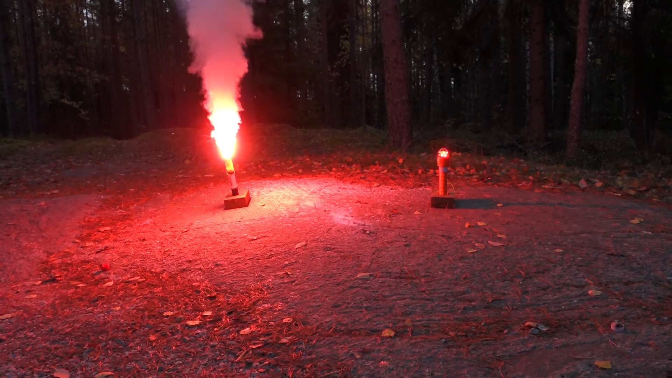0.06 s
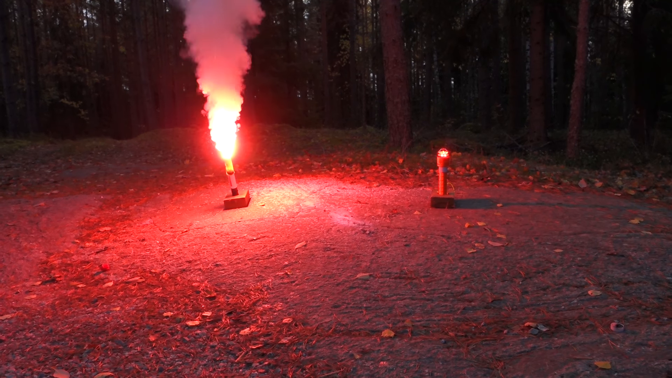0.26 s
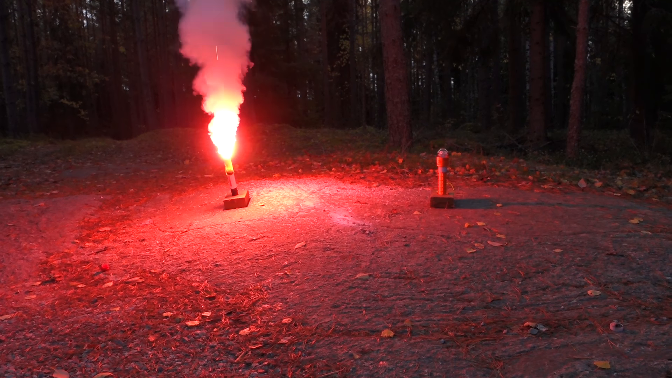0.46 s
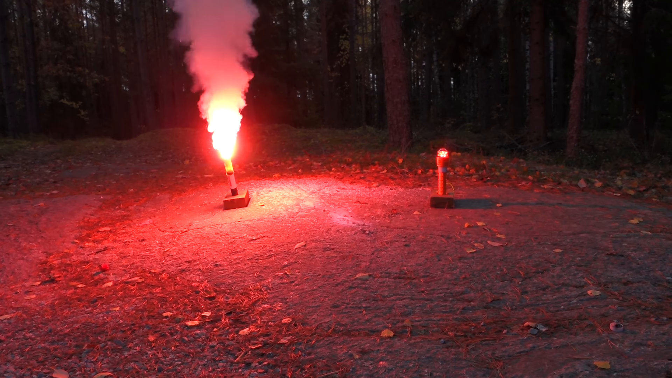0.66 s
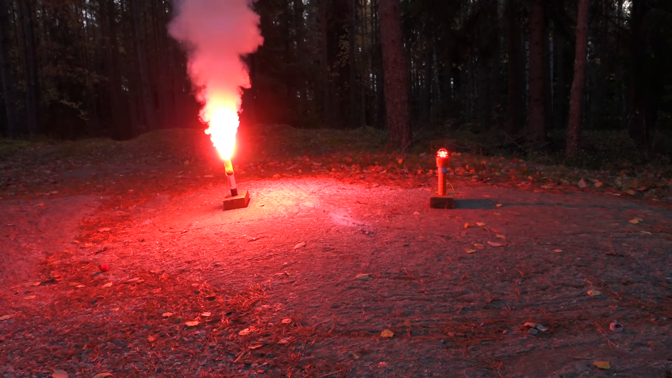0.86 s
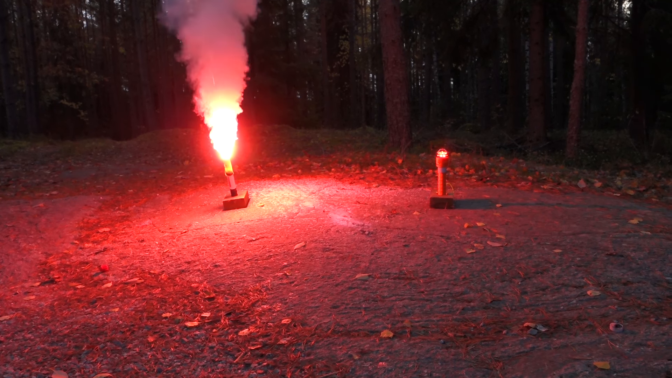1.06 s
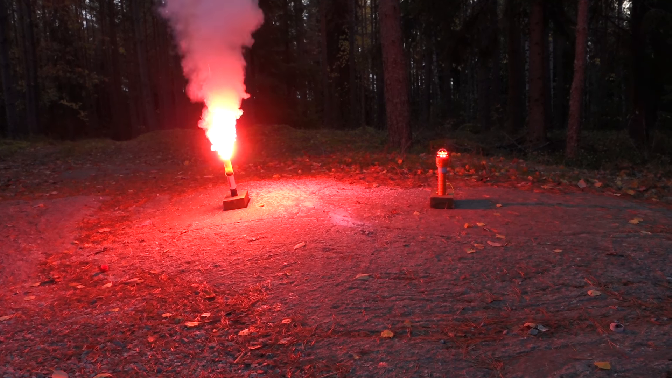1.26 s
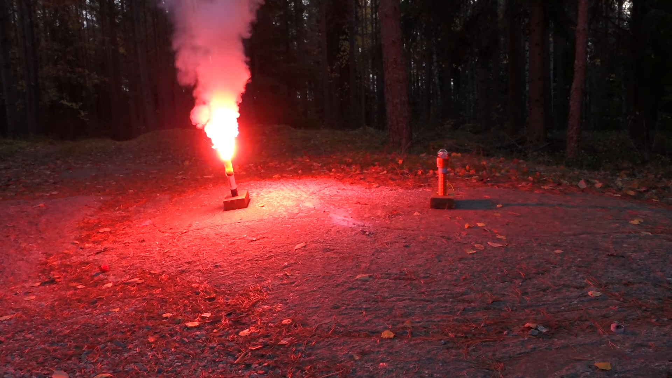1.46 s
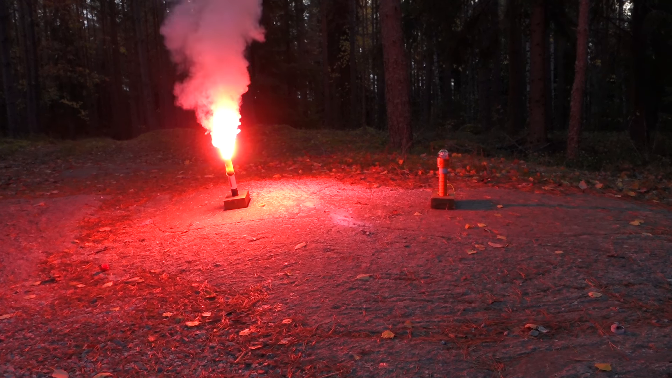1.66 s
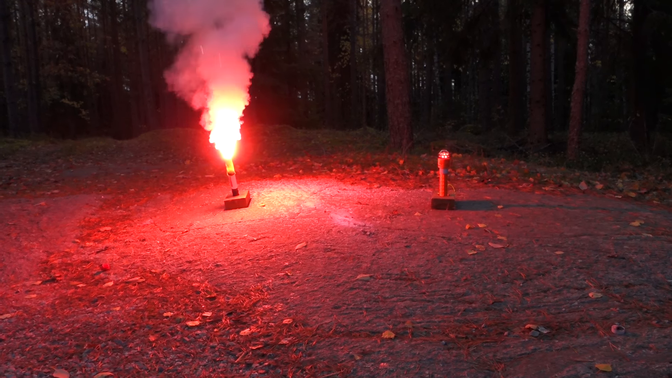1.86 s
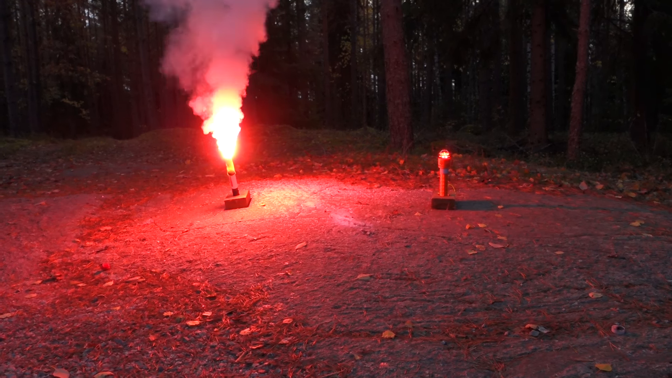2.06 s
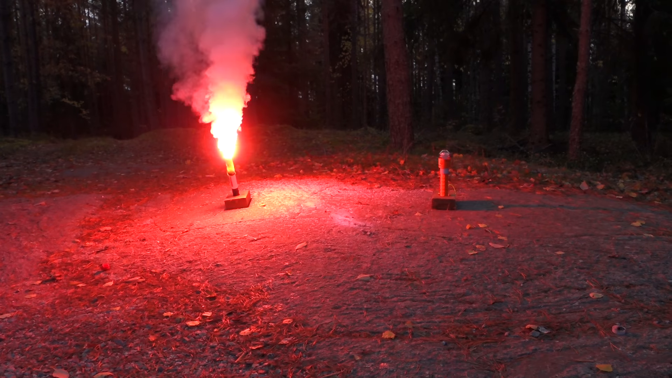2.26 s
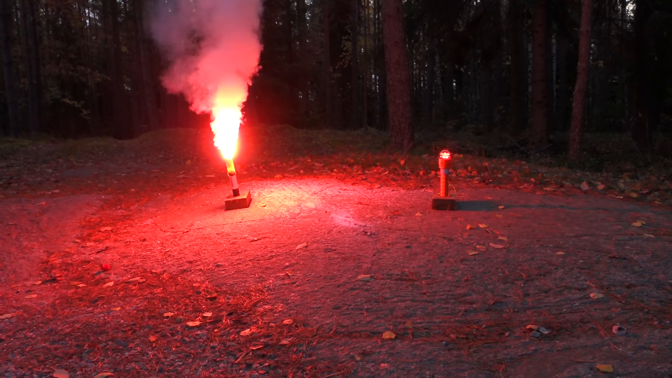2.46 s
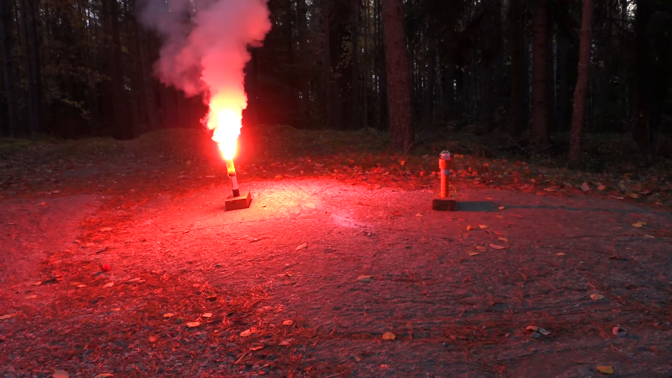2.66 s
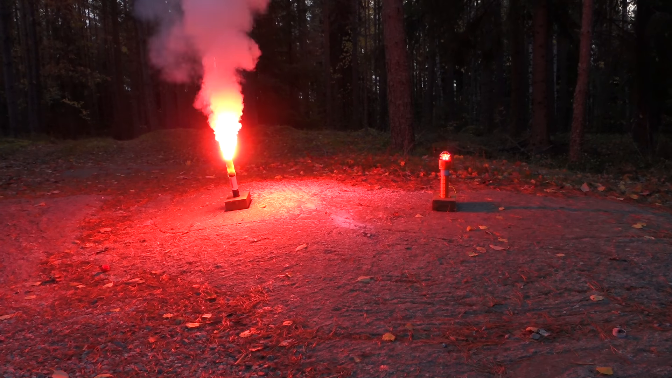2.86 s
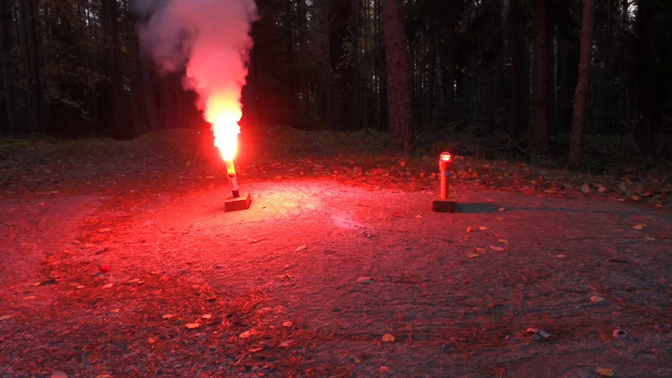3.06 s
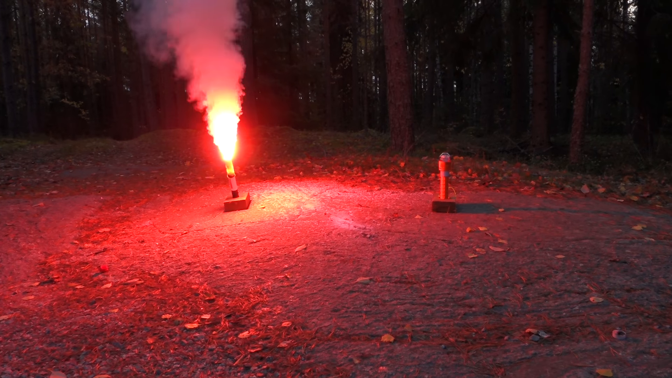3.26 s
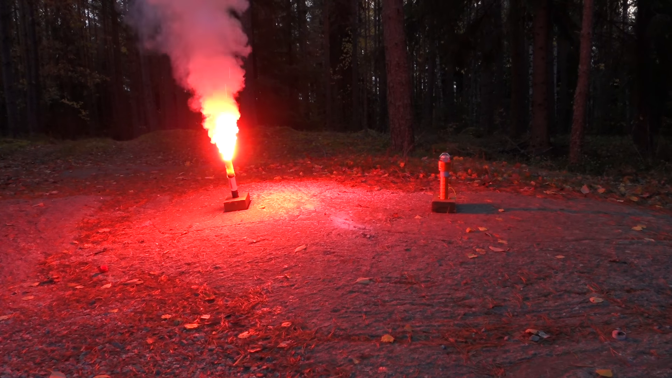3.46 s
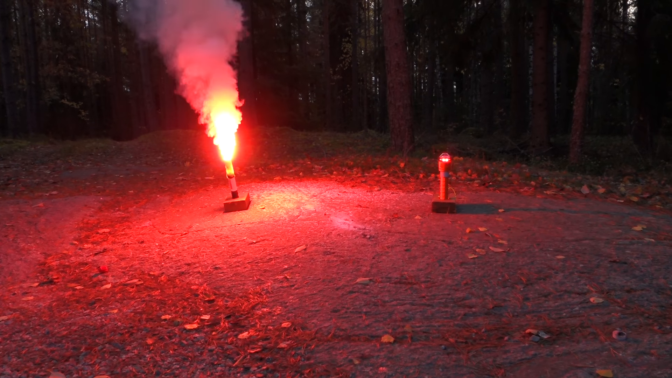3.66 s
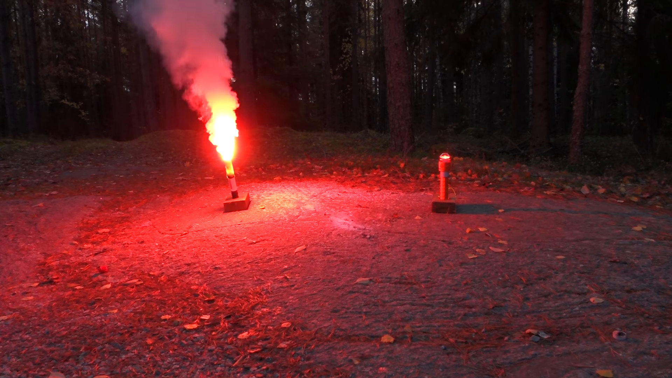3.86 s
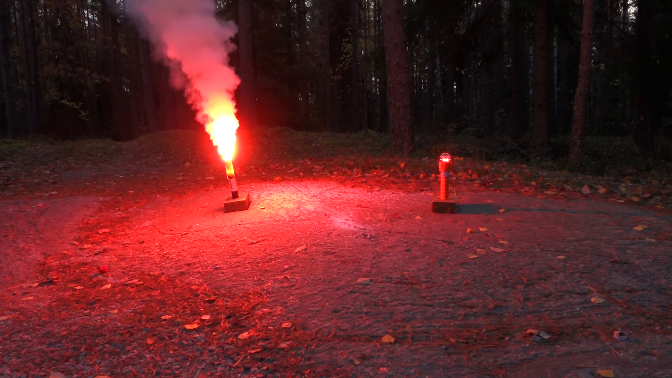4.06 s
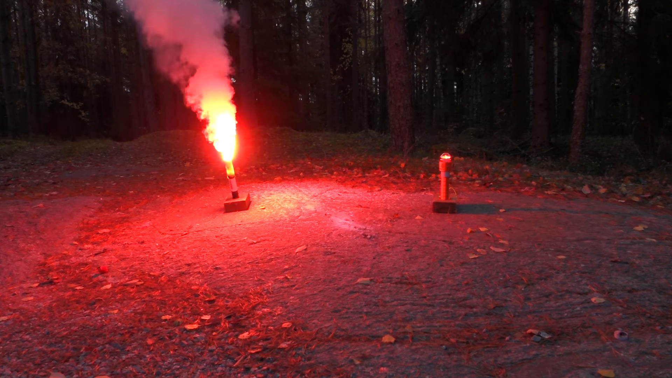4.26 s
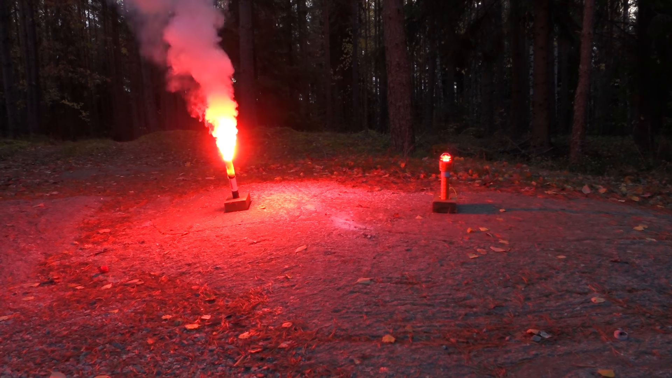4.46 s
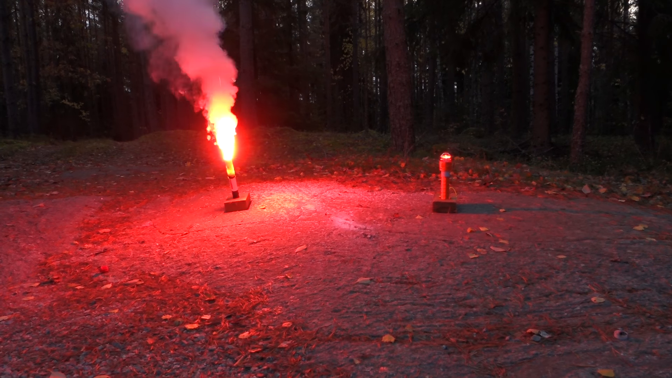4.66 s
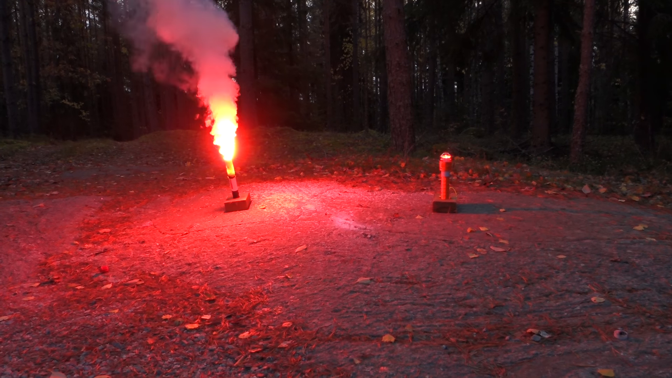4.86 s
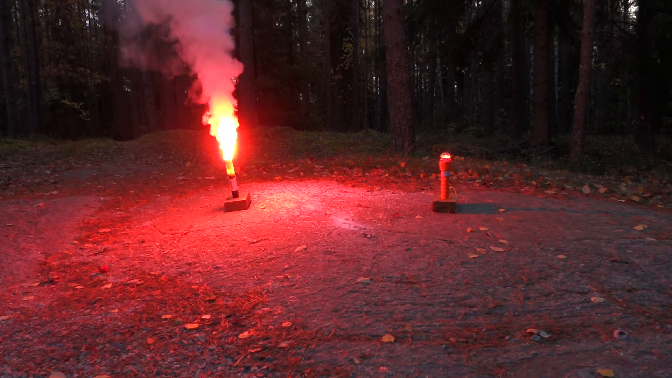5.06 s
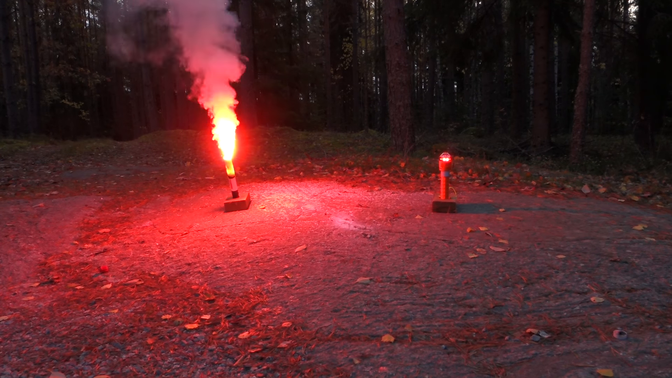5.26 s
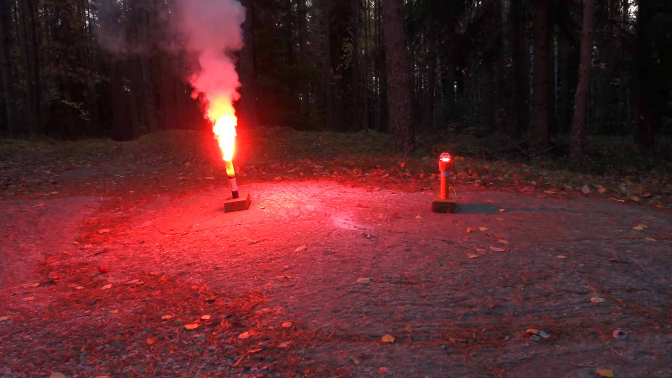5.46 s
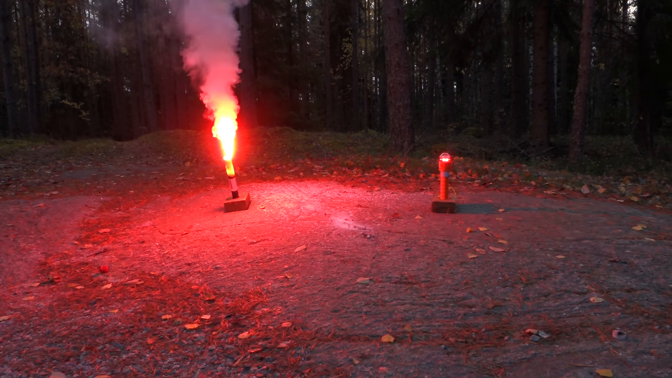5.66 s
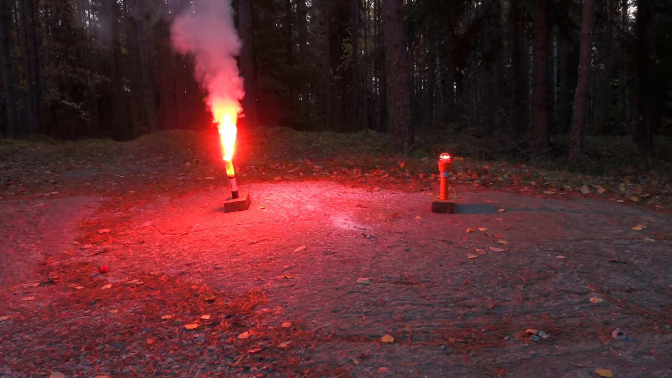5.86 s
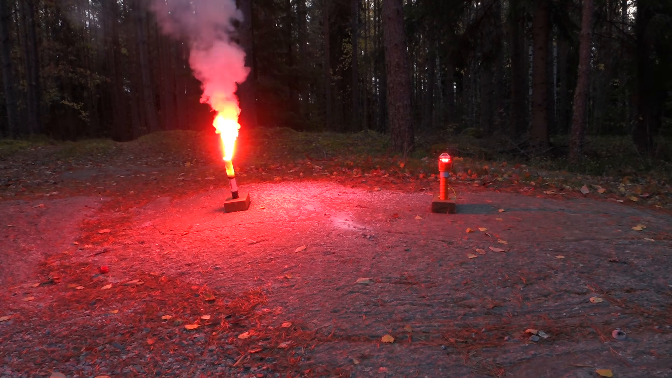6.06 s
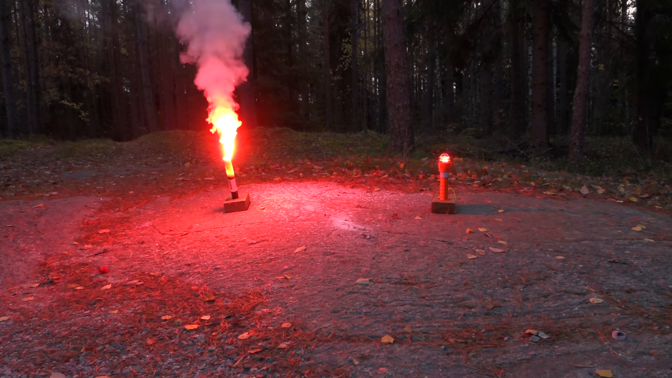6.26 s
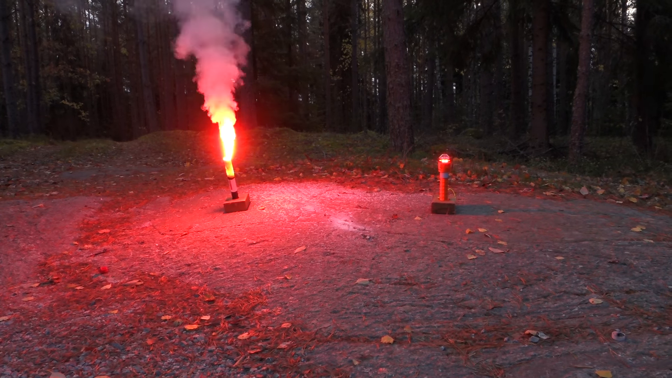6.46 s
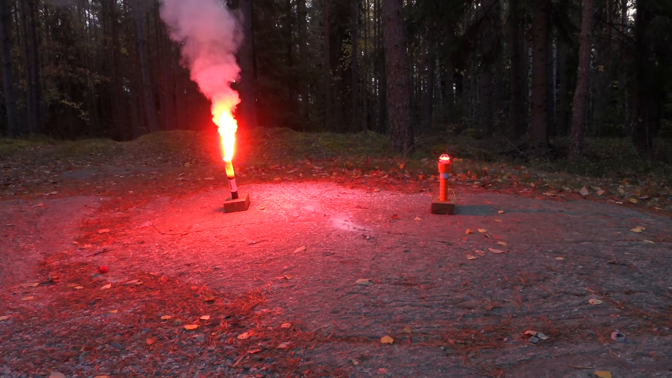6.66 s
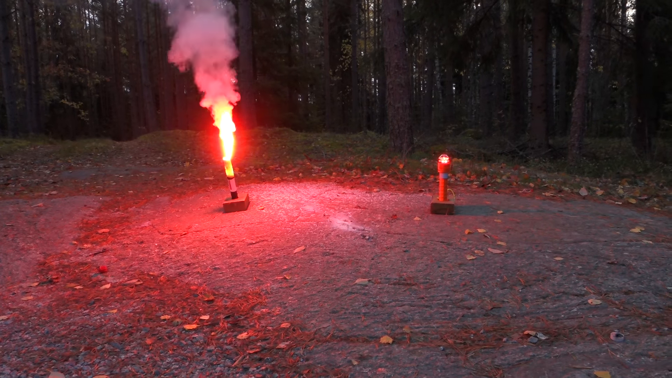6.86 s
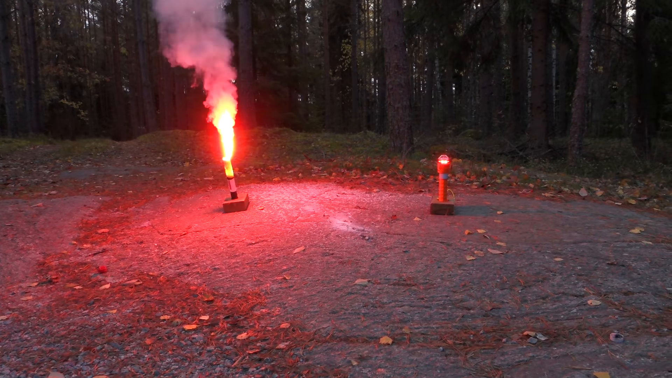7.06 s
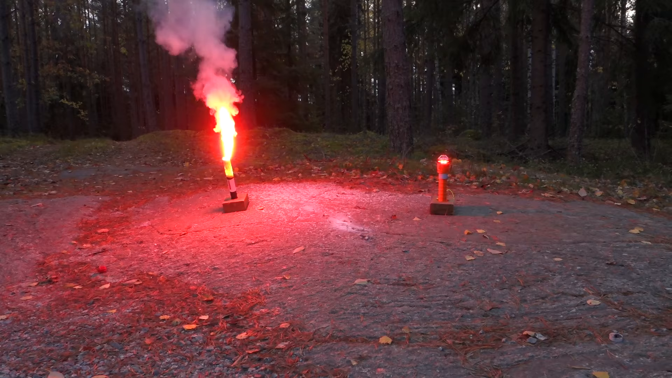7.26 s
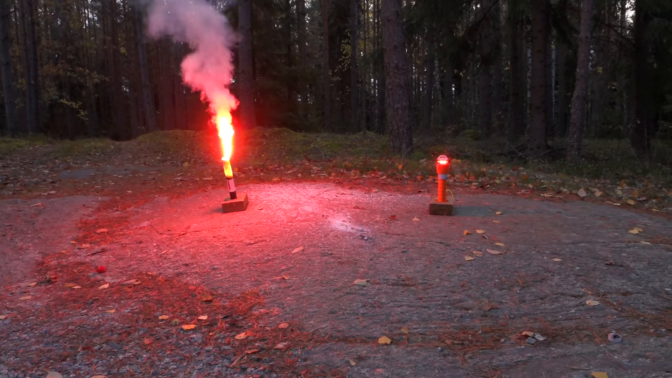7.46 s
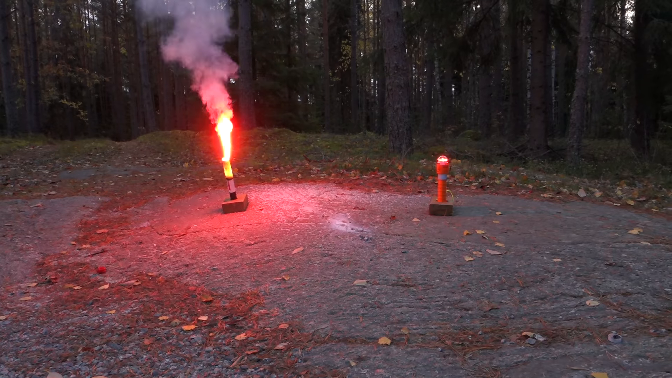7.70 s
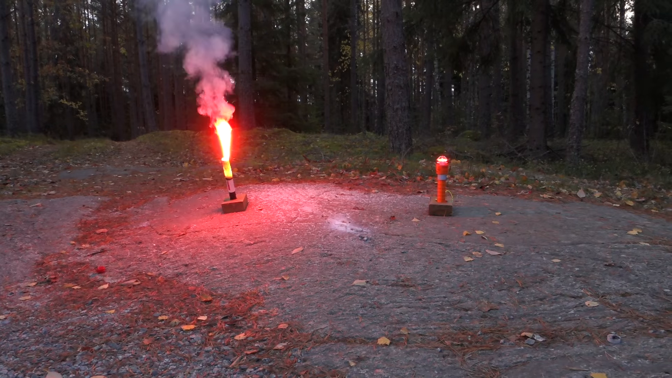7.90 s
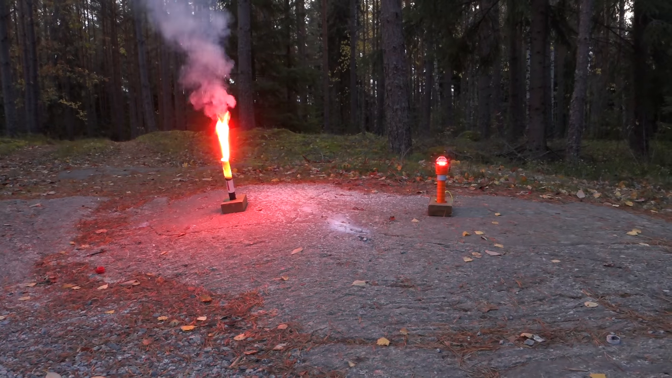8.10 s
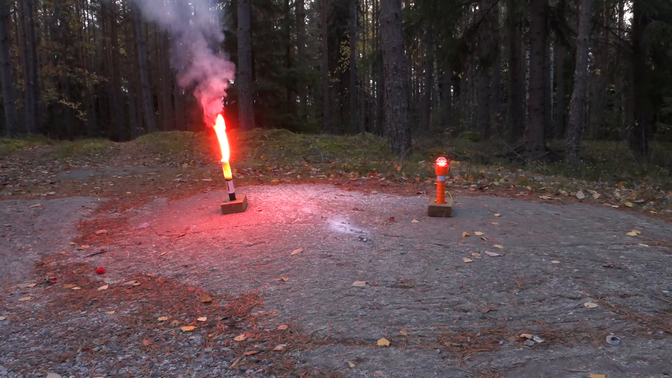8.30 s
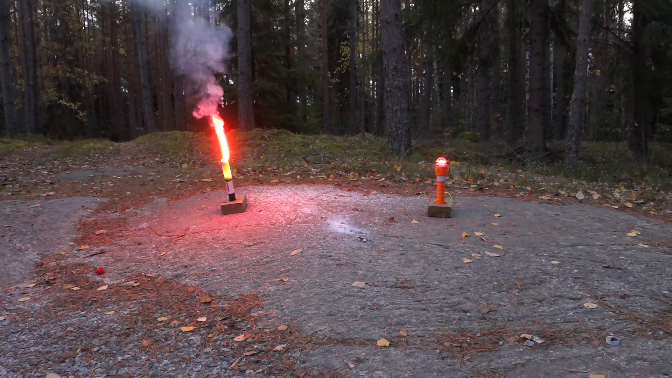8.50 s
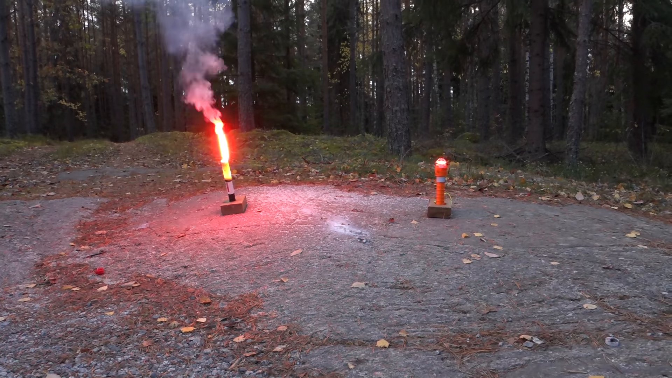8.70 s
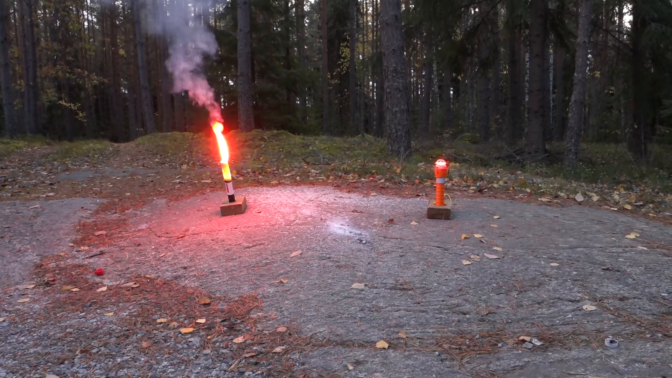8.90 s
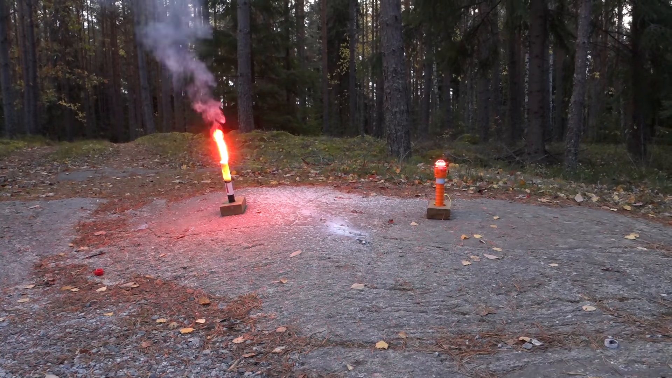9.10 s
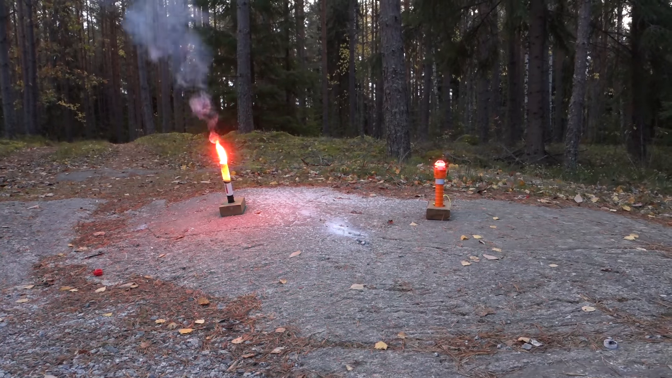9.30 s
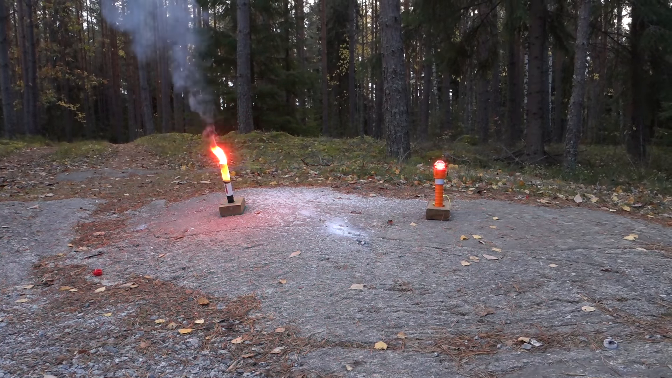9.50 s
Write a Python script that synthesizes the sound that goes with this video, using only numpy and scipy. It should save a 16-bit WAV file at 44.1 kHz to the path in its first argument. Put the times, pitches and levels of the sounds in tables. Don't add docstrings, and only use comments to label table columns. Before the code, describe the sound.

A hand flare roars and hisses loudly outdoors, then chokes, crackles and pops as it dwindles into near silence among trees.

```python
import sys
import numpy as np
from scipy import signal
from scipy.fft import rfft, irfft, next_fast_len
from scipy.io import wavfile
from scipy.ndimage import map_coordinates

SR = 44100
rng = np.random.default_rng(int(sys.argv[2]) if len(sys.argv) > 2 else 0)


def attenuation_scalar(level_db):
    decades = np.asarray(level_db, float) / 20
    return 10 ** decades


def generate_wav(signal):
    frames = np.transpose(np.atleast_2d(signal))
    scaled = np.clip(frames, -1, 1) * 32767
    pcm = np.round(scaled).astype(np.int16)
    wavfile.write(sys.argv[1], SR, pcm)


N = 420704

# start_s, share of single pops (0-1)
CHOKE = [
    (0, 0),
    (3.5, 0.12),
    (5, 0.42),
    (7, 0.24),
    (8, 0.5),
    (9.54, 0.7),
]
# freq_hz, level_db
FIZZ = [(3000, -33.5), (6000, 1.5), (8000, 5.5), (10000, -2.5), (12500, -4.5), (14000, -9.5), (15000, -1),
        (15800, -20)]


def unit(x):
    return x / np.sqrt(np.mean(x ** 2) + 1e-20)


def along(points, hz, axis=1):
    table = np.array(points)
    return np.interp(np.log(hz + 1), np.log(table[:, 0] + 1), table[:, axis])


def curves(rows):
    time_s, *columns = np.transpose(rows)
    return [np.interp(np.arange(N) / SR, time_s, column) for column in columns]


def wobble(knots_per_s):
    knots = rng.standard_normal(int(N * knots_per_s / SR) + 4)
    return map_coordinates(knots, [np.arange(N) * knots_per_s / SR])


def filtered(x, response):
    size = next_fast_len(N + 8192)
    return irfft(rfft(x, size) * response(np.fft.rfftfreq(size, 1 / SR)), size)[..., :N]


def pulse(spectrum, size=4096):
    level_db = along(spectrum, np.fft.rfftfreq(size, 1 / SR))
    cepstrum = irfft(np.log(attenuation_scalar(level_db)), size)
    cepstrum[1:size // 2] *= 2
    cepstrum[size // 2 + 1:] = 0
    shape = irfft(np.exp(rfft(cepstrum)), size)[:size // 2]
    return shape / np.abs(shape).max()


def coloured(x, spectrum):
    return signal.fftconvolve(x, pulse(spectrum))[:N]


def pair(two, likeness):
    def mid_side(hz):
        turn_rad = np.arccos(np.clip(likeness(hz), -1, 1)) / 2
        return np.array([np.cos(turn_rad), np.sin(turn_rad)])

    mid, side = filtered(two, mid_side)
    return np.array([mid + side, mid - side])


def turbulence(share, per_s, spread_db):
    chance, size, noise = rng.random(N), rng.exponential(size=N), rng.standard_normal(N)
    pop_amp = attenuation_scalar(spread_db * np.minimum(size, 5))
    bangs = unit((chance < per_s / SR) * pop_amp)
    share = np.clip(share, 0, 1)
    return np.sqrt(1 - share) * noise + np.sqrt(share) * (bangs - bangs.mean())


def flare():
    # freq_hz, level_db
    roar_colour = [(30, -21), (70, -27.5), (110, -17), (150, -13.5), (220, -7), (300, -2), (500, 2),
                   (800, 5.5), (1300, -13.5), (3000, -43)]
    jet_colour = [(300, -40), (800, 5.5), (1300, 0.5), (2000, 0), (3200, 0), (4300, -4.5), (5500, -11),
                  (7000, -15), (9000, -23.5), (14000, -48)]
    roar_db, deep_db, jet_db, bright_db, fizz_db = burn()
    choke, = curves(CHOKE)
    flicker_db = choke * (1.1 * wobble(25) + 2 * wobble(70))

    deep_hz, bright_hz = 330, 3200
    roar = unit(coloured(turbulence(0.24 * choke, per_s=900, spread_db=3.5), roar_colour))
    deep = filtered(roar, lambda hz: 1 / (1 + (hz / deep_hz) ** 4))
    roar = roar + (attenuation_scalar(deep_db) - 1) * deep

    jet = unit(coloured(turbulence(1.13 * choke, per_s=2000, spread_db=4.0), jet_colour))
    bright = filtered(jet, lambda hz: 1 - 1 / (1 + (hz / bright_hz) ** 6))
    jet = jet + (attenuation_scalar(bright_db + 5.5) - 1) * bright

    fizz = unit(coloured(turbulence(0.5 * choke, per_s=3100, spread_db=1.0), FIZZ))
    sizzle_db = (0.18 + 2.0 * choke) * wobble(22) + 1.67 * wobble(60)
    return (attenuation_scalar(roar_db + 0.17 * flicker_db + 3.5) * roar
            + attenuation_scalar(jet_db + flicker_db) * jet
            + attenuation_scalar(fizz_db + 0.78 * flicker_db + sizzle_db + 4.0) * fizz)


def burn():
    # start_s, gas_flow_db, slag crust over the mouth (0-1)
    burning = [(0, -21.5, 0), (2.0, -20.5, 0.07), (2.7, -22, 0.08), (3.3, -21, 0.21), (3.75, -23.5, 0.19),
               (4.25, -26, 0.58), (4.9, -28.5, 0.77), (5.4, -31, 0.89), (6.6, -32, 0.69), (7.2, -35, 0.43),
               (7.55, -36.5, 0.73), (7.65, -40.5, 0.24), (8.0, -42, 0.37), (8.15, -47.5, 0.3),
               (8.73, -52.5, 0.44), (8.77, -61.5, 0.4), (9.05, -65, 0.2), (9.13, -73.5, 0.2)]
    # centre_s, change_db
    surges = [(.75, 0.2), (1.75, 0.3), (3.0, -0.1), (3.8, 1.5), (3.92, -1), (4.1, 1.5), (4.4, 3.5),
              (4.6, 0.5), (4.72, -1), (4.95, 1.5), (5.2, 0), (5.5, 0.5), (5.8, 0.5), (5.9, -1.5), (6.07, 1),
              (6.2, -2), (6.3, 0.8), (6.82, -0.5), (7.1, 0.5), (7.3, -1), (7.4, 1), (7.72, 2), (8.25, 2),
              (8.42, 1), (8.63, -4), (8.72, -2), (8.84, 0.5), (9.04, 0)]
    # centre_s, roar_step_db, deep_step_db
    slumps = [
        (6.92, -0.5, 3),
        (7.6, -4, 6.5),
        (8.2, -3, -10),
        (8.78, 11.5, -5),
        (9.1, 6, -1),
    ]
    surge_half_s, slump_half_s = 0.031, 0.019
    surge_fizz, surge_roar = 1.6, 0.67
    ember_db_per_s = -28
    t = np.arange(N) / SR
    (gas_db, crust), (choke,) = curves(burning), curves(CHOKE)
    gas_db = gas_db + ember_db_per_s * np.maximum(t - burning[-1][0], 0)

    surge_db = sum(db * np.exp(-0.5 * ((t - s) / surge_half_s) ** 2) for s, db in surges)
    slump_db, deep_db = sum(np.outer(steps_db, 1 + np.tanh((t - s) / slump_half_s)) / 2
                            for s, *steps_db in slumps)

    roar_db = gas_db - 7.5 + 6 * crust + slump_db + surge_roar * surge_db
    bright_db = -3.5 - 6 * crust + 7.5 * choke
    fizz_db = gas_db - 16 - 13.5 * crust + 2 * choke + surge_fizz * surge_db
    return roar_db, deep_db, gas_db + surge_db, bright_db, fizz_db


def pops():
    # start_s, peak_db
    pockets = [(4.8434, -7), (5.3145, -22), (5.634, -15), (5.7066, -28), (5.882, -14), (6.9286, -12),
               (7.0236, -18), (7.0745, -25), (7.1902, -30), (7.3933, -15), (7.4168, -8), (7.4476, -13),
               (7.516, -9), (7.5444, -18), (8.0226, -21), (8.0433, -17.5), (8.4695, -33), (8.2124, -32),
               (8.244, -21.5), (8.4058, -26), (8.4384, -22), (8.4495, -31), (8.5675, -38), (8.5227, -28),
               (8.5362, -27.5), (8.723, -31), (8.7846, -44), (8.8639, -46), (8.9058, -37), (8.9886, -44)]
    edge_db, edge_grows = -39, 0.72
    blunt, edge = np.zeros(N), np.zeros(N)
    for s, db in pockets:
        at = round(s * SR) + 40
        blunt[at] = attenuation_scalar(db - 2.5)
        edge[at] = attenuation_scalar(edge_db + edge_grows * db)
    blunt_colour = [(100, -32), (500, -4), (1500, -5), (2500, 0), (4500, -8), (7000, -21), (12000, -45)]
    return coloured(blunt, blunt_colour) + coloured(edge, FIZZ)


def spits():
    # start_s, peak_db
    slag_bursts = [(0.661, -22), (1.0595, -22.5), (1.4539, -15), (2.8723, -24), (4.1519, -28),
                   (4.1971, -28), (4.4607, -22), (4.5607, -27), (4.6839, -25), (4.7807, -25), (4.8664, -29),
                   (4.9426, -31), (5.0002, -25), (5.1596, -33), (5.2016, -29), (5.2828, -31), (5.3869, -16),
                   (5.798, -25), (5.9851, -31), (6.3294, -41), (6.5356, -34), (6.8343, -22), (6.9852, -31),
                   (7.1011, -35), (7.1396, -29), (7.4011, -35), (7.5058, -40), (7.6168, -31), (7.875, -50),
                   (8.0195, -34)]
    # start_s, peak_db
    cracks = [(5.31, -32), (5.6576, -22), (5.6769, -36), (5.7432, -34), (5.754, -32), (5.9949, -24),
              (6.227, -37), (6.2455, -24), (6.2561, -15.5), (6.2998, -26), (6.4722, -20), (6.5603, -34),
              (6.6874, -20), (6.7622, -39), (6.9295, -23), (7.0247, -25), (7.267, -33), (7.3638, -22),
              (7.3906, -42), (7.5169, -30), (7.7045, -33), (7.8939, -32), (8.245, -34), (8.3481, -43),
              (8.5238, -29)]
    # freq_hz, level_db
    slag = [(3000, -30), (6000, -9), (8000, -5), (12000, 0), (15500, 2)]
    low_db, sizzle_db = -2, -18
    crack_snap_db, crack_snap_grows = -30, 0.4
    bursts = [(s, db, db + low_db) for s, db in slag_bursts]
    bursts += [(s, crack_snap_db + crack_snap_grows * db, db) for s, db in cracks]

    swell, snaps, thuds, t = np.zeros(N), np.zeros(N), np.zeros(N), np.arange(N) / SR
    for s, snap_db, thud_db in bursts:
        near = slice(round((s - 0.02) * SR), round((s + 0.06) * SR))
        u = (t[near] - s) / 0.004
        fall = 0.8 * np.exp(-1.5 * u) + 0.15 * np.exp(-0.4 * u)
        swell[near] += attenuation_scalar(snap_db + sizzle_db + 4.0) * np.where(u < 0, np.exp(1.2 * u), fall)
        snaps[round(s * SR) - 2] = attenuation_scalar(snap_db + 6.0)
        thuds[round(s * SR) - 4] = attenuation_scalar(thud_db + 1)
    sizzle = swell * unit(coloured(rng.standard_normal(N), slag))
    lower = coloured(thuds, [(1000, -24), (2500, -4), (4500, 0), (7000, -5), (11000, -26)])
    return sizzle + coloured(snaps, slag) + lower


def ground(x):
    # freq_hz, level_db
    soil = [(300, -11.5), (900, 0.4), (3000, -2.5), (5500, -12), (8000, -3), (10500, -15.5), (12500, -9),
            (15000, -3)]
    # freq_hz, left_over_right_db, left_lead_rad
    left = [(300, 0, .02), (740, .5, .03), (1220, 2.5, .08), (2010, 1.5, .15), (3330, 1, .35),
            (5500, 1.5, .55), (9080, .5, .6), (12500, -1.5, .9), (15000, -2, 1.6)]
    # delay_ms, level_db, phase_rad
    near_things = [
        (2.7, -19.5, 0.74),
        (3.25, -23, -0.8),
    ]
    # delay_ms, level_db, phase_rad, centre_hz
    stump = (5.55, -8, .28, 900)
    stump_octaves = 0.44
    delay_s, turn_rad = 0.00043, 0.78
    choke, = curves(CHOKE)

    def soil_response(hz):
        return attenuation_scalar(along(soil, hz)) * np.exp(-1j * (2 * np.pi * hz * delay_s + turn_rad))

    def echo(hz, ms, db, rad):
        return attenuation_scalar(db) * np.exp(1j * (rad - 2 * np.pi * hz * ms / 1000))

    def arrival(hz):
        octaves = np.log2((hz + 1) / stump[3])
        stump_echo = echo(hz, *stump[:3]) * np.exp(-0.5 * (octaves / stump_octaves) ** 2)
        near = 1 + stump_echo + sum(echo(hz, *thing) for thing in near_things)
        log_ratio = along(left, hz) * np.log(10) / 20 + 1j * along(left, hz, axis=2)
        return near * np.exp(np.outer([0.5, -0.5], log_ratio))

    bounce = filtered(x, soil_response)
    return filtered(x + attenuation_scalar(3.2 * choke - 0.4) * bounce, arrival)


def trunks(x):
    # freq_hz, t60_s, level_db, left-right likeness
    scatter = [(300, 0.64, -30.5, 0.96), (914, 0.48, -14, 0.51), (2970, 0.46, -11.5, 0.095),
               (8100, 0.48, -5.5, 0.089), (15000, 0.22, -3, 0.01)]
    hz, t, z = signal.stft(rng.standard_normal((2, SR // 2)), SR, nperseg=256)
    t60_s = along(scatter, hz)[:, None]
    tail = signal.istft(z * attenuation_scalar(-60 * t / t60_s) / np.sqrt(t60_s), SR, nperseg=256)[1]
    delay_s = 0.021 + 0.00008 * wobble(4)
    late = map_coordinates(x, [np.arange(N) - SR * delay_s])
    wet = signal.fftconvolve(late[None], tail / np.linalg.norm(tail[0]), axes=1)[:, :N]
    wet = filtered(wet, lambda hz: attenuation_scalar(along(scatter, hz, axis=2)))
    return pair(wet, lambda hz: along(scatter, hz, axis=3))


def forest_air():
    # freq_hz, level_db (per Hz)
    air = [(40, -19), (100, -10), (180, -4), (300, -3), (520, -1.5), (800, -3.5), (1250, -2.5), (1450, -7),
           (1700, 3), (1850, -2), (2050, -16), (3500, -14), (6000, -46)]
    # freq_hz, left-right likeness
    alike = [(60, 0.69), (180, 0.97), (550, 0.66), (1650, -0.094), (4970, -0.03), (15000, 0.1)]
    two = filtered(rng.standard_normal((2, N)), lambda hz: attenuation_scalar(along(air, hz)))
    return attenuation_scalar(-61.0 + 0.43 * wobble(2.43)) * unit(pair(two, lambda hz: along(alike, hz)))


def scene():
    flame, bursts, (choke,) = flare(), pops() + spits(), curves(CHOKE)
    scattered = attenuation_scalar(1.5 * choke) * (flame + 0.35 * bursts)
    return ground(flame + bursts) + trunks(scattered) + forest_air()


def band_limit(x):
    return signal.sosfilt(signal.butter(12, 15900, fs=SR, output="sos"), x)


def record(dry):
    # freq_hz, level_db
    hiss_colour = [(300, -15), (2000, -4), (8000, -4.5), (13000, -4), (15000, -3), (15400, -4),
                   (15600, 8.5), (15750, 3)]
    top_hz, bass_hz = 15760, 90
    noise = rng.standard_normal((2, N))
    hiss = unit(filtered(noise, lambda hz: attenuation_scalar(along(hiss_colour, hz)) * (hz < top_hz)))
    heard = filtered(dry, lambda hz: (1j * hz / (1j * hz + bass_hz)) ** 2)
    heard = heard + attenuation_scalar([[-63], [-60]]) * hiss
    mix = filtered(heard, lambda hz: 1 / (1 + (hz / top_hz) ** 400))
    return band_limit(mix)


dry = scene()
out = record(dry)
generate_wav(out)
```